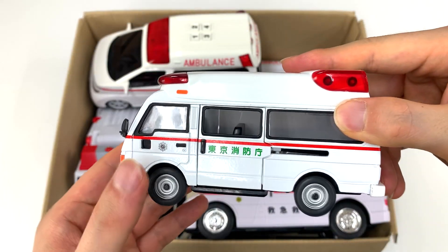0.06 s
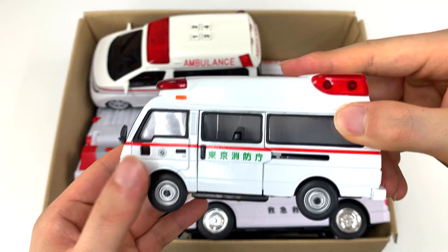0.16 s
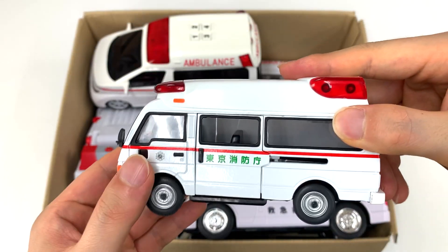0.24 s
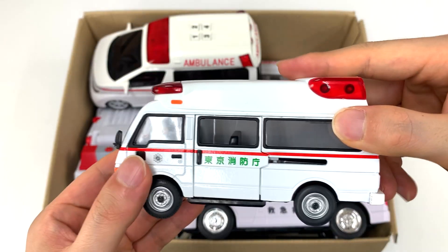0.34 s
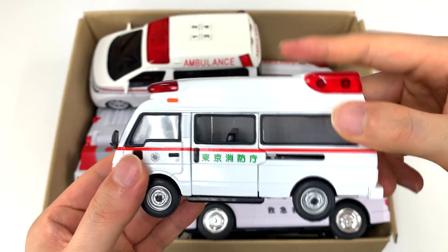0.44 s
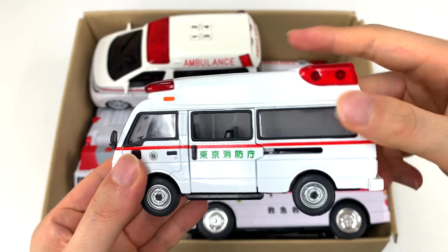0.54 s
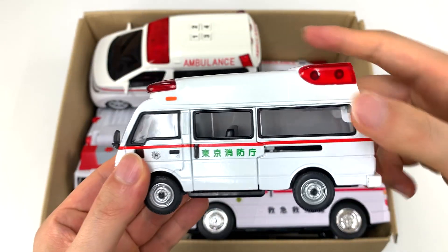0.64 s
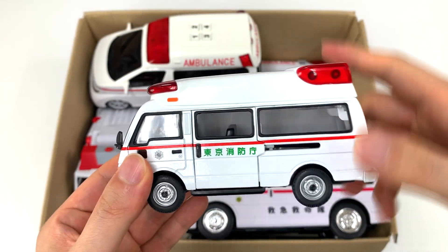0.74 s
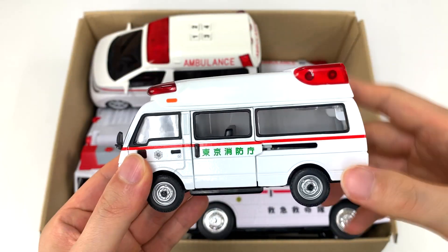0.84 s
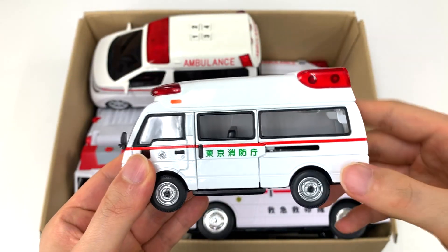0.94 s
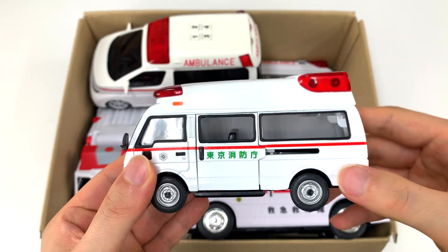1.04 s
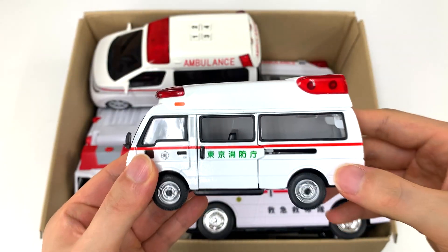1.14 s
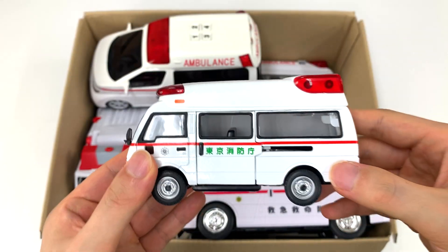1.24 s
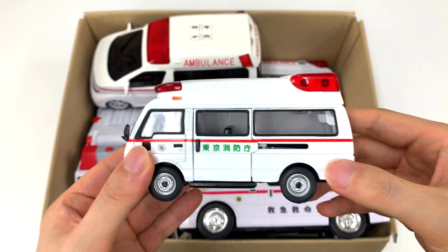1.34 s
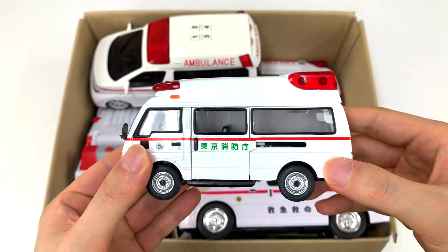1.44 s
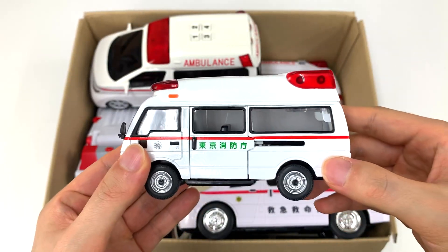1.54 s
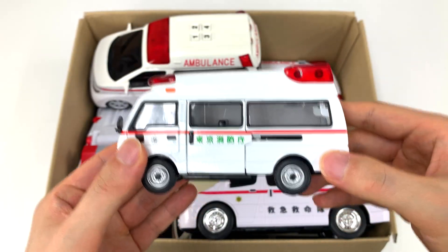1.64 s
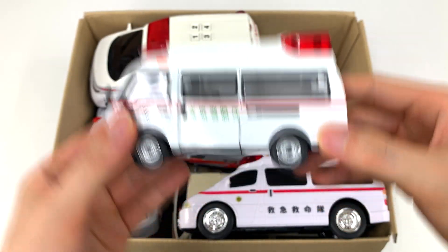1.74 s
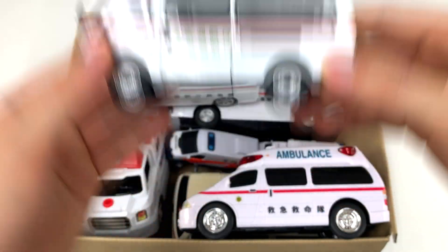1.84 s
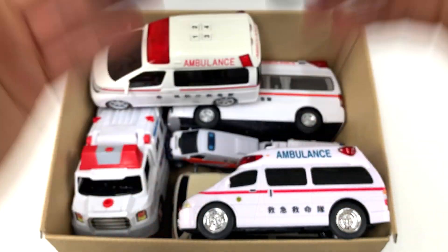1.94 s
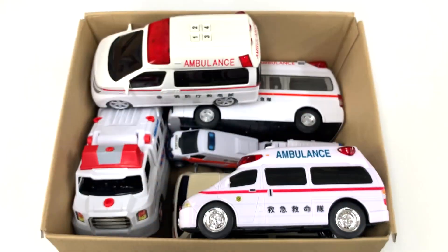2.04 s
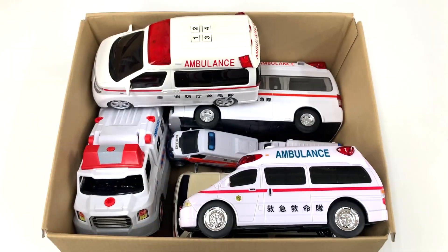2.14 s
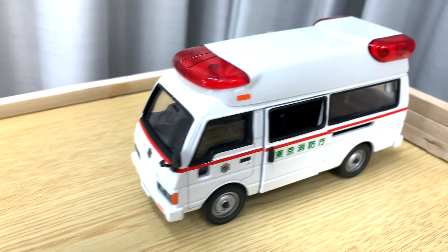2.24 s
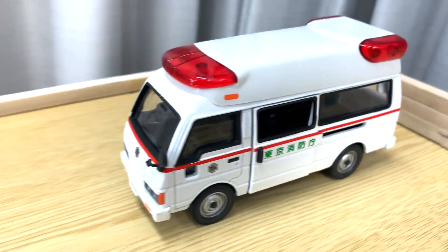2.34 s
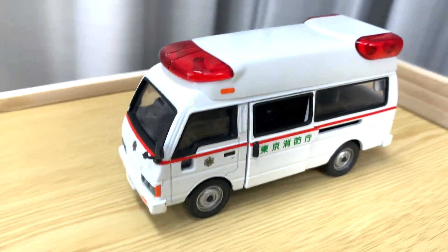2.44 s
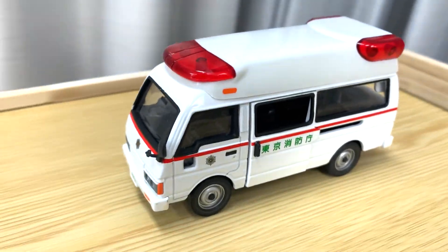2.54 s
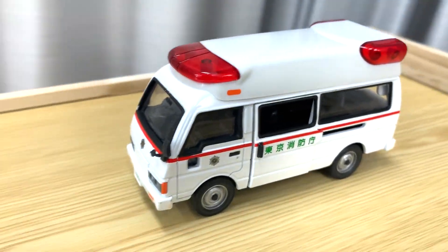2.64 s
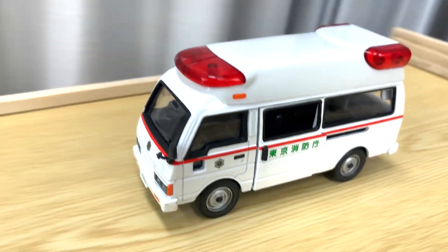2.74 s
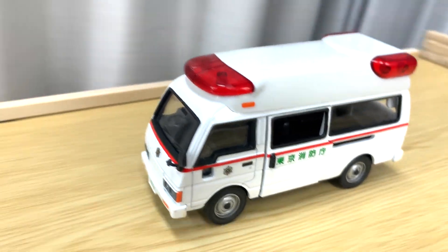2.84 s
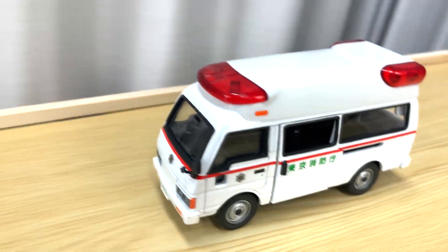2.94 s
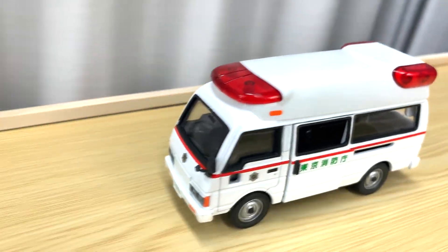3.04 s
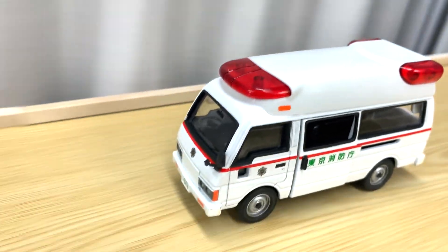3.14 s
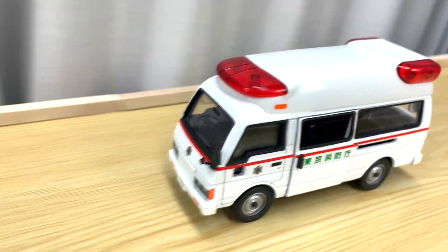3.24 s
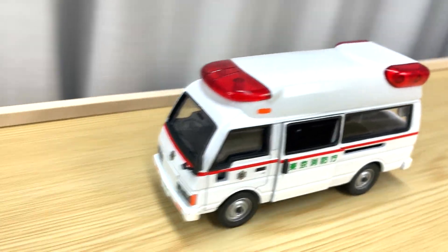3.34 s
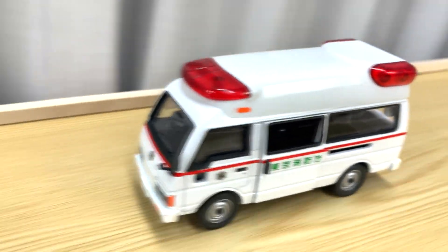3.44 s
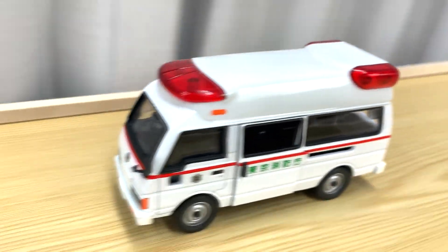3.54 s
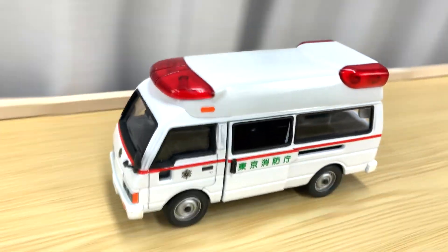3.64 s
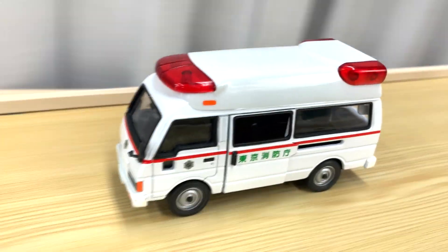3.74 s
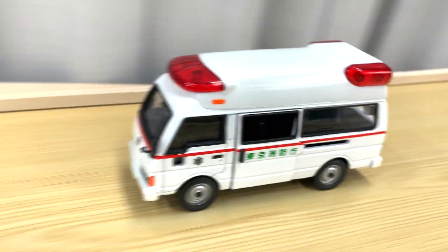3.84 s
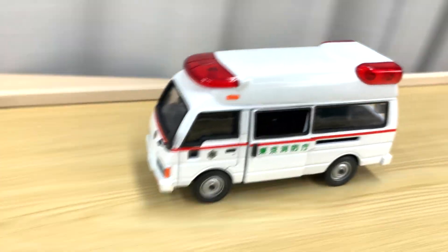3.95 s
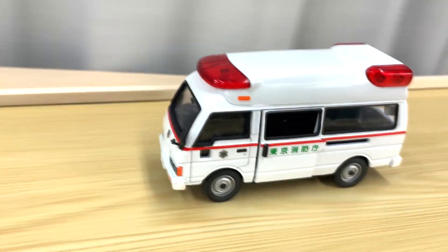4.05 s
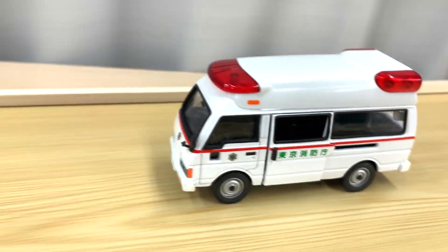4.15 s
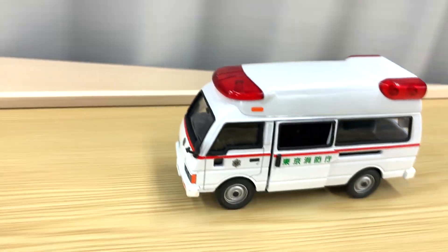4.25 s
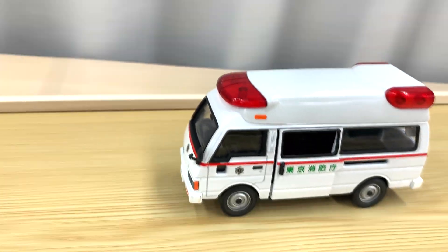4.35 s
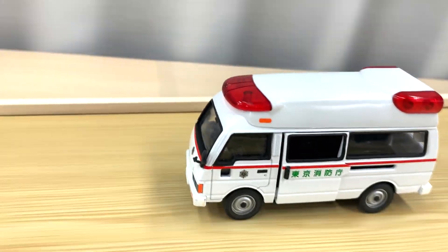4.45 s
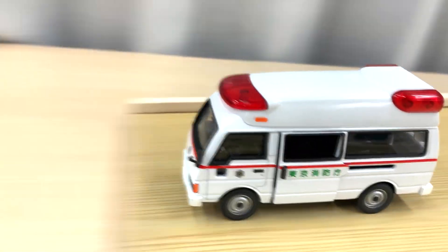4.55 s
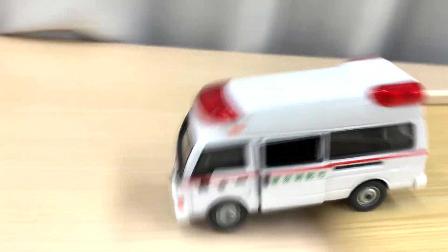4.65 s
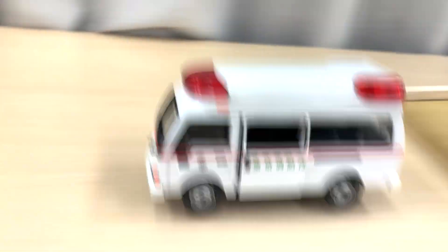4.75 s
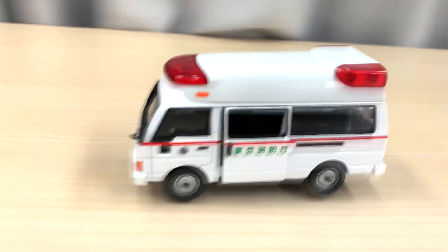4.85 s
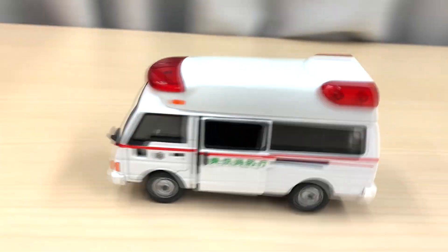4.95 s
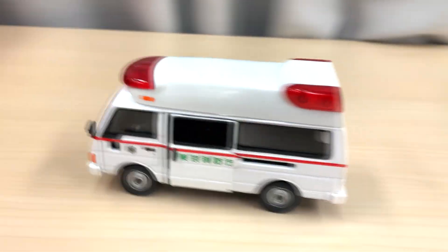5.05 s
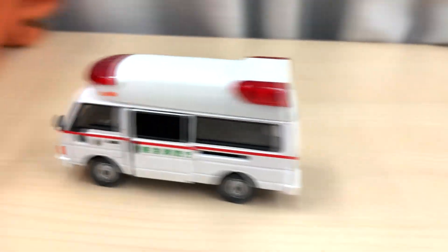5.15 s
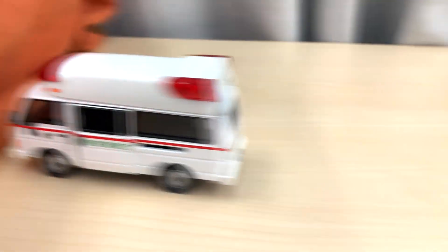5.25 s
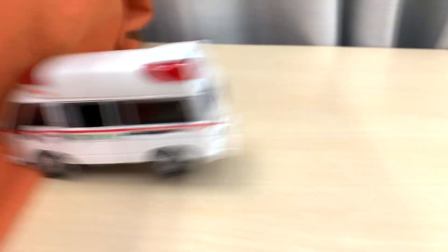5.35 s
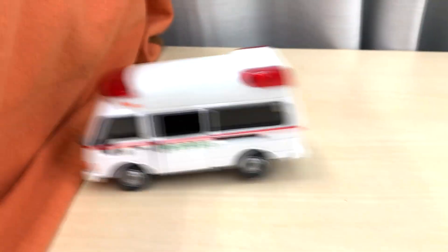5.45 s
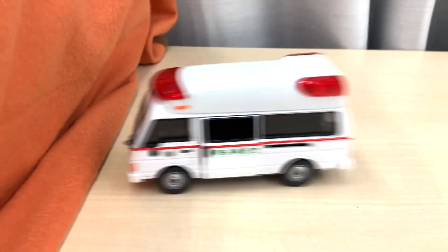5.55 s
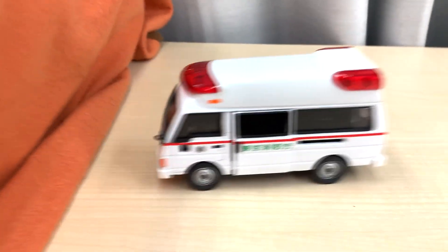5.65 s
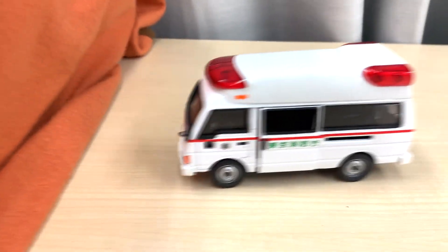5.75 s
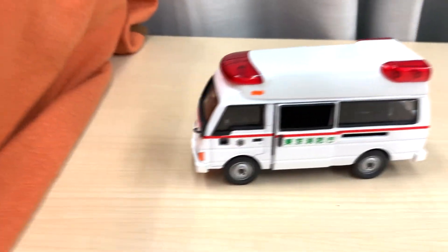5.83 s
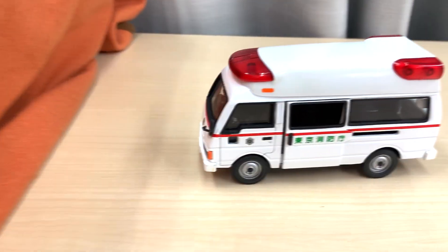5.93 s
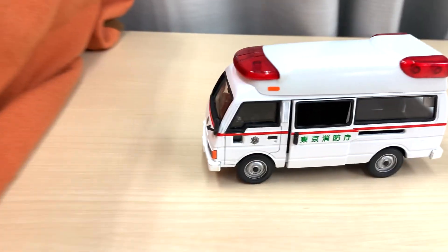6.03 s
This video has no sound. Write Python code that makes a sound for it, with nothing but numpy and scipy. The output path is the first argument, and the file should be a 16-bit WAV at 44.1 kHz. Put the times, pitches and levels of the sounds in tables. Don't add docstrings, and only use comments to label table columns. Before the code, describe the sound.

Quiet fingering of a hollow metal toy, then its wheels chatter down a wooden slope, drop onto a table with hard clacks and halt.

```python
import sys
import numpy as np
from scipy import signal
from scipy.fft import rfft, irfft, next_fast_len
from scipy.io import wavfile

SR = 44100
rng = np.random.default_rng(int(sys.argv[2]) if len(sys.argv) > 2 else 0)


def store_wav(level_fs):
    pcm = np.round(np.clip(np.atleast_2d(level_fs), -1, 1) * 32767)
    wavfile.write(sys.argv[1], SR, pcm.T.astype(np.int16))


def boost(x):
    u = np.asarray(x, float) / 20
    return 10 ** u


N = 268480
RAMP_ENDS_S = 4.65


def unit(x):
    return x / np.sqrt(np.mean(x ** 2) + 1e-20)


def curves(rows, fade=0.087):
    s, *columns = np.transpose(rows)
    t = np.arange(N) / SR
    gate = np.clip(np.minimum(t - s[0], s[-1] - t) / fade + 1, 0, 1)
    return [np.interp(t, s, column) for column in columns] + [gate]


def wobble(rate, depth_db=None):
    knots = rng.standard_normal(int(N * rate / SR) + 2)
    values = knots if depth_db is None else boost(depth_db * knots)
    return np.interp(np.arange(N) * rate / SR, np.arange(len(knots)), values)


def filtered(x, response):
    m = next_fast_len(N + SR // 2)
    spectrum = rfft(x, m) * response(np.fft.rfftfreq(m, 1 / SR))
    return irfft(spectrum, m)[..., :N]


def band(x, lo_hz, hi_hz):
    edges = signal.butter(3, [lo_hz, hi_hz], "bandpass", fs=SR, output="sos")
    return signal.sosfilt(edges, x)


def noise(alike=1):
    share = np.clip(alike, 0, 1)
    common = np.sqrt(share) * rng.standard_normal(N)
    return common + np.sqrt(1 - share) * rng.standard_normal((2, N))


def ringing(x, modes, shift_db=0, rate=8):
    out, power = 0, 0
    for k, (hz, width_hz, db) in enumerate(modes):
        resonator = signal.iirpeak(hz, hz / width_hz, SR)
        mode = signal.lfilter(*resonator, x * wobble(rate, shift_db))
        out = out + (-1) ** k * boost(db) * mode
        power += boost(2 * db) * np.pi * width_hz / SR
    return out / np.sqrt(power)


def tone(rows):
    hz, db, gate = curves(rows, fade=0.065)
    sine = np.sin(2 * np.pi * np.cumsum(hz) / SR)
    return np.sqrt(2) * gate * boost(db) * wobble(36, 0.41) * sine


def span(rows, rate):
    hz, db, gate = curves(rows, fade=.02)
    swing = signal.savgol_filter(np.array([wobble(rate), wobble(rate)]), 121, 1)
    phase = 2 * np.pi * np.cumsum(hz) / SR
    song = unit(swing[0] * np.sin(phase) + swing[1] * np.cos(phase))
    return gate * boost(db - 1.5) * wobble(16, 1.9) * song


def contacts(events, ping_db, ping_t60, noise_db, sag=0):
    force, pings = np.zeros((3, N + SR)), np.zeros(N + SR)
    t = np.arange(SR // 8) / SR
    for s, db, knock_db, sizzle_db, hz, *length in events:
        lasting_s = max(*length, .004) if length else .008
        start = round((s - .001) * SR)

        def burst(stretch):
            return (1 - np.exp(-t / 0.00051)) * boost(-21 * t / (stretch * lasting_s))

        shape = [boost(knock_db) * burst(1.81), boost(noise_db) * burst(1.0), boost(sizzle_db + 4.0) * burst(0.91)]
        force[:, start:][:, :len(t)] += boost(db) * np.array(shape)
        level_db = db + ping_db + (knock_db if hz < 2400 else 0)
        if length:
            level_db -= 8
        decay = boost(level_db - 60 * t / ping_t60) * (1 - np.exp(-t / 0.0018))
        pressed = sag * (1 - np.exp(-t / .0017))
        pings[start:][:len(t)] += decay * np.sin(2 * np.pi * hz * (t + pressed))
    return force[:, :N], pings[:N]


ALIKE = [0.54, 0.6, 0.95]
# (frequency [Hz], width [Hz], level [dB])
AXLE_MODES = [(7470, 1730, 6), (9190, 1200, 1), (9200, 1200, 1.5), (13100, 800, -2), (13800, 600, -6),
              (15800, 1500, -17)]


def toy(force, body, panels, edge_hz):
    grit = unit(wobble(1500, 1.0))
    shaken = [f * grit * noise(alike) for f, alike in zip(force, ALIKE)]
    low = band(ringing(shaken[0], body, shift_db=2.5, rate=22), 130, edge_hz)
    middle = band(ringing(shaken[1], panels, shift_db=2.5, rate=30), 1800, 6100)
    high = band(ringing(shaken[2], AXLE_MODES, shift_db=0.5, rate=25), 5000, 21000)
    return low + middle + high


# (time [s], level [dB])
ROLL = [(2.29, -75.5), (2.6, -63.5), (2.92, -56.5), (3.25, -51), (3.56, -50.5), (3.85, -42.5), (4.12, -36),
        (4.35, -40.5), (4.53, -36.5), (4.87, -41.5), (5.27, -42), (5.46, -34.5), (5.58, -43.5),
        (5.66, -65.5), (6.09, -107)]


def rolling():
    chatter_db, gate = curves(ROLL, fade=0.0035)
    table = np.clip((np.arange(N) / SR - RAMP_ENDS_S) / 0.06, 0, 1)

    def driven_db(full_db, grows, on_table_db):
        return full_db + grows * (chatter_db + 40) + on_table_db * table

    bumps = np.tanh(wobble(55))
    tyres = boost(driven_db(-40, 0.71, -8.5)) * unit(boost(4.7 * bumps) * wobble(300, 1.2))
    chatter = boost(chatter_db) * unit(boost(3.5 * bumps + 7.5 * np.tanh(wobble(400))))
    axles = boost(-40) * (chatter / boost(-32.5)) ** 1.83
    drumming = boards(driven_db(-41, 0.3, 3.9), driven_db(-46, 0.36, 4.7))
    return gate * np.array([tyres, chatter, axles]), gate * drumming


def rattles(rows, hz, scatter_hz, knock_db, loss_db):
    out = []
    for (s, db, sizzle_db, rebounds), luck in zip(rows, rng.standard_normal((len(rows), 5))):
        flight_s = max(0.027 - 0.0063 * (s - ROLL[0][0]), .0185)
        body_db = knock_db - 0.62 * (db + 31.5)
        if s > RAMP_ENDS_S:
            flight_s = 0.0064
            body_db -= 8
        for k in range(int(np.clip(round(rebounds), 0, 4)) + 1):
            out.append((s + k * flight_s, db - k * loss_db, body_db, sizzle_db, hz + scatter_hz * luck[k]))
    return out


# (time [s], peak [dB], sizzle [dB], rebounds [count])
AXLE_TICKS = [(2.434, -48, -40, 0), (2.5895, -38, -14.5, 2), (2.765, -35, -18, 0), (2.8055, -38.5, -13, 0),
              (2.882, -39.5, -27, 0), (2.9265, -44, -11, 0), (3.031, -36, -13.5, 1), (3.1415, -28, -13, 0),
              (3.2462, -36, -12, 1), (3.2812, -34, -35, 0), (3.5135, -28.5, -8.5, 0), (3.9567, -25, -6, 0),
              (4.0165, -23, -8, 0), (4.2352, -23, -3, 0), (4.3887, -23, -7.5, 0)]


def axle_ticks():
    return rattles(AXLE_TICKS, hz=3516.5, scatter_hz=73, knock_db=-5.5, loss_db=2.5)


# (time [s], peak [dB], sizzle
# [dB], rebounds [count])
DOOR_SLAPS = [(3.1796, -37.5, -17.5, -1), (3.426, -33, -17.5, 0.5), (3.8665, -40, 2, -1),
              (3.3277, -33.5, -26.5, -0.5), (3.449, -36, -18, -2), (3.4966, -34, -20, 4),
              (3.597, -31, -34, -5), (3.6716, -20.5, -16, 4), (3.796, -35.5, -5, 0),
              (3.8866, -28.5, -13, -2), (4.148, -19, -12, -2.5), (4.2114, -26.5, -3, -1),
              (4.273, -23.5, -16.5, 0.5), (4.4479, -25, -10, -2.5), (4.5955, -23.5, -8.5, 4.5),
              (4.6208, -12, -2, 0), (5.013, -24, -6, 0), (5.0988, -44, 7.5, -1.5), (5.385, -41.5, 0, -1)]


def door_slaps():
    return rattles(DOOR_SLAPS, hz=2640.5, scatter_hz=72.5, knock_db=-4, loss_db=4.5)


# (time [s], peak [dB], body knock [dB], ping [Hz], burst length [s])
CLACKS = [(4.637, -32, -15, 3300, 0.02), (4.67, -19.5, -31, 3560, 0.035), (4.6779, -6, -5.5, 3830, 0.0058),
          (4.7445, -10, -6, 2600, 0.012), (4.7578, -9.5, -23, 4110, 0.017),
          (4.822, -15.5, -12.5, 4240, 0.016), (4.828, -7.5, -10, 3510, 0.0079),
          (4.8685, -21, -10.5, 2800, 0.019), (4.8885, -15, -10.5, 2840, 0.012),
          (4.924, -25, -9.5, 3200, 0.022), (4.9347, -22.5, -8, 2500, 0.0089),
          (4.969, -24.5, -3, 2760, 0.012), (4.982, -22.5, -6.5, 2740, 0.02),
          (5.0305, -16, -11, 3250, 0.009), (5.056, -28, -7, 2800, 0.028), (5.326, -24.5, -9, 3200, 0.016),
          (5.328, -17.5, -9, 2930, 0.013), (5.333, -14, -11, 3300, 0.02), (5.3387, -8, -12.5, 3050, 0.013),
          (5.396, -32, -1, 3306, 0.034), (5.429, -7.5, -14, 4090, 0.014),
          (5.4314, -18.5, -12.5, 4030, 0.057), (5.5027, -7.5, -10.5, 2640, 0.014),
          (5.5486, -12, -11, 2930, 0.012), (5.579, -26, -7, 3260, 0.026), (5.601, -30, -18, 2893, 0.0091)]


def clacks():
    return [(s, db, knock_db, -3, hz, length) for s, db, knock_db, hz, length in CLACKS]


def ticks(rows, gain_db, knock_db, sizzle_db):
    return [(s + .0012, db + gain_db, knock_db - 0.62 * (db + 30.5), rel_db + sizzle_db, hz)
            for s, db, hz, rel_db in rows]


# (time [s], peak [dB], ping [Hz], sizzle [dB])
FAST_TICKS = [(3.4103, -36.5, 3634, -14.5), (3.5141, -27, 3570, -5.5), (3.5455, -27, 3454, -15.5),
              (3.6208, -35, 3375, -11), (3.6722, -39.5, 3790, -2), (3.6897, -43.5, 3310, -17),
              (3.7096, -41.5, 3350, -13.5), (3.7251, -33, 3570, -9.5), (3.747, -31.5, 3650, -2.5),
              (3.783, -38.5, 3445, -10.5), (3.8214, -29.5, 3690, -5.5), (3.8563, -31, 3500, -13.5),
              (3.8877, -37, 3740, -1.5), (3.9256, -24, 3600, -4), (3.9576, -24, 3500, -11.5),
              (3.978, -29, 3700, -10), (3.9975, -21, 3510, -15), (4.0154, -33.5, 3420, -4),
              (4.0598, -37.5, 3555, -21), (4.0743, -38, 3546, -13), (4.0888, -20, 3410, -5.5),
              (4.1107, -21, 3664, -6), (4.1282, -22, 3610, -7), (4.1706, -35, 3700, -8),
              (4.1865, -35, 3660, -11), (4.2105, -35.5, 3750, -2.5), (4.2339, -24, 3550, -2),
              (4.2519, -28, 3520, -9.5), (4.2718, -36.5, 3720, -8.5), (4.2908, -29, 3600, -13),
              (4.3088, -37.5, 3580, -14.5), (4.3232, -26.5, 3510, -15.5), (4.3372, -18.5, 3420, -13.5),
              (4.4245, -35.5, 3315, -10.5), (4.4634, -25, 3400, -10.5), (4.4819, -22, 3400, -14.5),
              (4.5208, -30.5, 3690, -9.5), (4.5392, -20.5, 3490, -12), (4.5951, -32, 3520, -1.5),
              (4.6146, -31, 3440, 7.5)]


def fast_ticks():
    strikes = ticks(FAST_TICKS, gain_db=-1.0, knock_db=-11.5, sizzle_db=-1.5)
    return contacts(strikes, ping_db=11.5, ping_t60=0.0098, noise_db=-6.0)


# (time [s], peak [dB], ping [Hz], sizzle [dB])
TABLE_TAPS = [
    (5.1269, -19.5, 2530, -5.5),
    (5.1497, -28, 2560, -5),
    (5.17, -26, 2540, -9.5),
    (5.1868, -29, 2950, -0.5),
    (5.198, -34.5, 3200, -5.5),
    (5.2251, -43, 3150, -3.5),
    (5.2583, -19, 2520, -10.5),
    (5.2804, -19, 2530, -15),
    (5.3014, -31, 2560, 0),
    (5.317, -29, 3150, -9),
]


def table_taps():
    strikes = ticks(TABLE_TAPS, gain_db=5.0, knock_db=-6.5, sizzle_db=-2.5)
    return contacts(strikes, ping_db=3.5, ping_t60=0.03, noise_db=-5.5, sag=.00045)


def knocks(rows, gain_db, t60, attack):
    out, t = np.zeros(N + SR), np.arange(SR // 10) / SR
    for (s, db, hz), luck in zip(rows, rng.standard_normal((len(rows), 2))):
        twin_hz = hz * (1 + 0.054 * luck[0])
        pair = np.sin(2 * np.pi * hz * t) + 0.69 * np.sin(2 * np.pi * twin_hz * t + 2 * luck[1])
        decay = boost(db + gain_db - 60 * t / t60) * (1 - np.exp(-t / attack))
        out[round((s - .001) * SR):][:len(t)] += decay * pair
    return out[:N]


# (time [s], peak [dB], pitch [Hz])
ROOF_KNOCKS = [(3.5157, -31.5, 2020), (3.598, -43, 1840), (3.6214, -41.5, 1960), (3.6733, -32.5, 1944),
               (3.6953, -42, 1870), (3.7482, -39, 2020), (3.7846, -42, 1900), (3.8678, -38.5, 1970),
               (3.8893, -38, 2100), (3.9272, -34.5, 1900), (3.9455, -29, 1990), (3.9796, -25.5, 2150),
               (4.0018, -30, 1940), (4.0175, -22.5, 1960), (4.0767, -43, 1920), (4.0907, -33, 2000),
               (4.1113, -29, 1960), (4.1482, -27, 2030), (4.1717, -28.5, 1950), (4.2131, -30, 1810),
               (4.2136, -25, 1960), (4.236, -22, 2000), (4.257, -25.5, 1910), (4.2924, -32.5, 1940),
               (4.3214, -36.5, 2120), (4.3882, -42.5, 1870), (4.4246, -32.5, 1900), (4.4486, -34, 2000),
               (4.47, -31, 1920), (4.4825, -30.5, 2080), (4.523, -34.5, 1900), (4.5458, -38, 1960),
               (4.556, -33, 1860), (4.5798, -37, 1935), (4.5997, -30, 2100), (4.6192, -19.5, 2013)]
# (time [s], peak [dB], pitch [Hz])
FLOOR_KNOCKS = [(2.7934, -47, 1370), (2.8064, -44, 1280), (2.8824, -52, 1400), (2.9707, -43.5, 1325),
                (3.0281, -44, 1320), (3.282, -35, 1390), (3.3287, -34.5, 1280), (3.4268, -29, 1154),
                (3.544, -37, 1310), (3.5963, -28, 1190), (3.6173, -34.5, 1300), (3.672, -34, 1370),
                (3.747, -27.5, 1350), (3.7993, -39, 1450), (3.822, -35.5, 1360), (3.8725, -37, 1350),
                (3.8876, -26, 1457), (3.926, -28.5, 1380), (3.958, -26, 1390), (4.0024, -27, 1250),
                (4.0157, -24.5, 1450), (4.0947, -37.5, 1320), (4.1153, -24, 1370), (4.2158, -27.5, 1510),
                (4.2402, -25, 1350), (4.3231, -30.5, 1470), (4.4099, -42, 1410), (4.4469, -38.5, 1410),
                (4.4706, -32.5, 1360), (4.5387, -35, 1460), (4.5561, -39, 1330), (4.5965, -33.5, 1420),
                (4.6207, -19.5, 1356)]
# (time [s], peak [dB], pitch [Hz])
HARD_KNOCKS = [(3.032, -45, 585), (3.337, -34, 615), (3.339, -35.5, 890), (3.428, -30, 860),
               (3.515, -29, 650), (3.597, -29, 863), (4.681, -17.5, 1507), (4.68, -19, 2000),
               (4.746, -17, 1700), (4.746, -19, 2150), (4.761, -18, 1330), (4.829, -18.5, 2003),
               (4.68, -35, 290), (5.341, -28, 290), (5.338, -26.5, 422), (5.336, -23.5, 794),
               (5.338, -22, 1680), (5.387, -31.5, 1140), (5.435, -31, 560), (5.434, -28, 800),
               (5.506, -25, 402), (5.549, -25.5, 424), (5.441, -21.5, 1360), (5.511, -24.5, 1400),
               (5.554, -25, 1364)]


def shell_knocks():
    roof = knocks(ROOF_KNOCKS, gain_db=1.0, t60=.035, attack=0.0012)
    floor = knocks(FLOOR_KNOCKS, gain_db=-2.5, t60=.04, attack=0.002)
    return roof + floor + knocks(HARD_KNOCKS, gain_db=1.0, t60=0.038, attack=0.0017)


# (time [s], peak [dB], t60 [s], swing [Hz])
THUDS = [(4.62, -37, 0.075, 140), (4.68, -17, 0.038, 156), (4.752, -27.5, 0.044, 131),
         (4.764, -19, 0.04, 155), (4.828, -28.5, 0.1, 164), (4.894, -28.5, 0.059, 124),
         (4.988, -24, 0.045, 123.5), (5.037, -33, 0.11, 94), (5.3375, -3, 0.022, 127),
         (5.4381, -17, 0.046, 109), (5.455, -28.5, 0.21, 133), (5.513, -18.5, 0.046, 106),
         (5.529, -31.5, 0.18, 133.7), (5.556, -31, 0.26, 131)]


def thuds():
    out, t = np.zeros(N + SR), np.arange(SR // 3) / SR
    for s, db, t60, hz in THUDS:
        swing = boost(15.0 - 60 * t / t60) * np.sin(2 * np.pi * hz * t)
        thump = boost(-0.5 - 60 * t / (0.03 + 0.26 * t60)) * np.sin(2 * np.pi * 62 * t)
        onset = 1 - np.exp(-(t / 0.0052) ** 2)
        out[round(s * SR):][:len(t)] += boost(db) * (swing - thump) * onset
    return out[:N]


# (frequency [Hz], width [Hz], level [dB])
SHELL_MODES = [(349, 92, -2), (444, 140, 0.5), (590, 98, 0), (754, 170, 0), (1080, 390, -3), (1380, 150, 1),
               (1637, 110, -2), (1960, 190, -1.5), (2210, 200, -8)]
# (frequency [Hz], width [Hz], level [dB])
PANEL_MODES = [(2592, 380, -3), (2790, 323, -3), (3200, 430, -4.5), (4983, 230, -9), (5780, 1100, -17.5)]


def running_toy(shaking):
    strikes = axle_ticks() + door_slaps() + clacks()
    force, pings = contacts(strikes, ping_db=9.0, ping_t60=0.011, noise_db=-3.5)
    fast, fast_pings = fast_ticks()
    taps, tap_pings = table_taps()
    body = toy(force + fast + taps + shaking, SHELL_MODES, PANEL_MODES, edge_hz=5100)
    return body + pings + fast_pings + tap_pings + shell_knocks() + thuds()


# (frequency [Hz], width [Hz], level [dB])
BOOM_MODES = [(54, 28, 0.0029), (102.7, 19, 0.0047)]
# (frequency [Hz], width [Hz], level [dB])
BOARD_MODES = [(134, 5.2, 5), (167, 110, -13)]


def boards(boom_db, board_db):
    boom = unit(ringing(ringing(noise(1.0), BOOM_MODES), BOOM_MODES))
    board = unit(ringing(ringing(noise(0.92), BOARD_MODES), [(140, 710, 0)]))
    return boost(boom_db + 1.5) * boom + boost(board_db + 2.5) * board


# (time [s], pitch [Hz], level [dB])
WHEEL_BEAT = [
    (3.28, 65.85, -37.5),
    (3.83, 84.5, -37),
    (3.86, 81.6, -73),
]
# (time [s], pitch [Hz], level [dB rms])
SWAY = [
    (4.05, 135, -45),
    (4.12, 134, -27),
    (4.2, 130.7, -39),
    (4.33, 132.3, -38),
]
# (time [s], pitch [Hz], level [dB rms])
RAMP_SPAN = [
    (2.95, 590, -57),
    (3.1, 607, -57),
    (3.8, 572, -45),
    (3.95, 562, -44.5),
    (4.1, 605, -43),
    (4.27, 752, -40),
    (4.35, 735, -45.5),
    (4.37, 735, -70),
]
# (time [s], pitch [Hz], level [dB rms])
TABLE_SPAN = [(4.3, 383, -53), (4.34, 370, -42.5), (4.39, 354, -37), (4.45, 351, -54), (4.5, 361, -64.5),
              (4.98, 359, -55), (5.1, 433, -45.5), (5.2, 427, -36.5), (5.29, 449, -42), (5.32, 430, -60.5),
              (5.57, 335, -60.5), (5.61, 331, -49.5), (5.7, 329.4, -58.5)]


def wood_song():
    beat = tone(WHEEL_BEAT) + tone(SWAY)
    return beat + span(RAMP_SPAN, rate=160) + span(TABLE_SPAN, rate=60)


# (time [s], body [dB], ping [Hz], sharpness [dB])
HANDLING = [(0.1155, -44.5, 903, -6.5), (0.205, -53, 2300, -14), (0.2652, -35, 2270, 2),
            (0.2699, -35, 1870, -4), (0.312, -53.5, 1020, 0), (0.343, -56.5, 1380, -0.5),
            (0.412, -59, 1830, 7), (0.448, -65.5, 1250, 7.5), (0.5394, -71.5, 2026, -8),
            (0.618, -59, 2070, -1), (0.9452, -49, 1270, 1.5), (0.9625, -55.5, 780, -6),
            (0.9727, -52.5, 1080, -6.5), (1.7948, -62, 2000, -12), (1.864, -56, 820, -17),
            (1.877, -44, 2155, -2), (1.888, -52.5, 1960, -5), (1.937, -51.5, 1990, -2.5),
            (1.967, -52, 1380, -4), (2.007, -49.5, 2150, -6.5), (2.0219, -47.5, 1083, 4.5),
            (2.026, -48.5, 1080, 10.5), (2.06, -50.5, 1080, -3), (2.072, -63, 1190, 2.5),
            (2.148, -43, 2430, -2), (2.158, -60, 1200, 0), (2.1844, -51, 1380, -3.5),
            (2.194, -57, 1790, -2), (2.394, -49.5, 1347, -9), (5.9724, -61.5, 1960, -14),
            (6.0312, -61.5, 1422, -20)]


def touches():
    return [(s, db + sharp_db, -sharp_db, -12.5 + 0.99 * sharp_db, hz) for s, db, hz, sharp_db in HANDLING]


# (time [s], level [dB])
RUB = [
    (0.0, -51),
    (0.12, -56),
    (0.234, -58),
    (0.25, -58.5),
]
# (frequency [Hz], width [Hz], level [dB])
CUPPED_MODES = [(560, 75, -6.5), (780, 27, -1), (904, 20, 4), (1060, 38, 2.5), (1190, 47, -6),
                (1470, 58, -2), (1580, 57, -8), (1900, 37, 0), (1960, 30, -6), (2150, 250, -8),
                (2346, 25, -7), (2465, 130, -5.5)]


def rub():
    db, gate = curves(RUB, fade=0.023)
    slips = noise(.7) * wobble(54, 1.6)
    song = ringing(slips, CUPPED_MODES, shift_db=2.2, rate=14)
    song = filtered(song, lambda hz: np.where((hz > 480) & (hz < 2550), 1, boost(-15)))
    return gate * boost(db) * unit(song)


# (frequency [Hz], width [Hz], level [dB])
HOLLOW_MODES = [(590, 110, -8.5), (787, 56, -3.5), (1011, 77, 3.5), (1190, 140, -2), (1320, 63, 0.5),
                (1524, 87, 1.5), (1900, 260, -1.5), (2210, 260, -1), (2540, 280, -3.5)]
# (frequency [Hz], width [Hz], level [dB])
HELD_MODES = [(3170, 380, 6), (4010, 340, -1), (5230, 1200, -1)]


def held_toy():
    force, pings = contacts(touches(), ping_db=1.5, ping_t60=0.04, noise_db=-6.0)
    return toy(force, HOLLOW_MODES, HELD_MODES, edge_hz=7100) + pings + rub()


# (frequency [Hz], t60 [s])
WALLS = [(200, 0.27), (2000, 0.23), (10000, 0.089)]


def walls(x):
    hz, t, z = signal.stft(noise(0.78)[:, :SR // 2], SR, nperseg=256)
    t60 = np.interp(hz, *np.transpose(WALLS))
    tail = signal.istft(z * boost(-60 * t / t60[:, None]), SR, nperseg=256)[1]
    delayed = np.pad(x, (350, 0))[None]
    return signal.fftconvolve(delayed, tail / np.linalg.norm(tail[0]), axes=1)[:, :N]


# (frequency [Hz], density [dB per Hz])
AIR = [(20, -20.5), (50, 0.5), (120, -9), (400, -28), (2000, -44), (5000, -48), (9600, -44.5), (14200, -46),
       (15000, -70.5)]
# (frequency [Hz], level [dB])
HUM = [(119.5, -71.5)]
# (time [s], level [dB])
SETTLING = [
    (0, -67),
    (.4, -64.5),
    (.6, -62),
    (2.25, -60.5),
    (2.3, -59.5),
    (6.09, -58),
]
# (time [s], pitch [Hz], level [dB])
MOTOR = [
    (0.0, 50.3, -66.5),
    (0.55, 49.5, -60),
    (1.3, 53, -50),
    (1.43, 54, -57),
    (1.8, 59, -48),
    (2.02, 60, -48.5),
    (2.1, 60, -64),
]


def background():
    f, density_db = np.transpose(AIR)
    air = unit(filtered(noise(0.72), lambda hz: boost(np.interp(np.log(hz + 1), np.log(f), density_db))))
    t = np.arange(N) / SR
    hum = sum(np.sqrt(2) * boost(db) * wobble(17.0, 0.37) * np.sin(2 * np.pi * hz * t) for hz, db in HUM)
    hum = hum * (t < 2.28)
    return boost(curves(SETTLING)[0]) * (air + boost(65.5) * hum) + tone(MOTOR)


def ports(x, lead):
    return filtered(x, lambda hz: np.exp(np.outer([.5j, -.5j], np.interp(hz, *np.transpose(lead)))))


# (frequency [Hz], phase [rad])
NEAR_LEAD = [(60, 0), (110, .55), (560, 7.3), (1500, 6.5), (1980, 6.7), (2450, 9.9), (2950, 10.2),
             (3300, 9.2), (3650, 6.9), (5300, 6.6), (5750, 4.7), (7000, 3.14), (11700, -3.14),
             (13900, -6.28), (16800, -8.4)]
# (frequency [Hz], phase [rad])
ROOM_LEAD = [(60, 0), (1000, .6), (2700, 1.2), (4800, 0), (7000, -3.14), (11700, -9.42), (13900, -12.57),
             (16800, -14.7)]


def scene():
    shaking, drumming = rolling()
    run = running_toy(shaking)
    hands = held_toy()
    room = walls(boost(-20.5) * run[0] + boost(-12.5) * hands[0])
    near = ports(run + drumming + wood_song(), NEAR_LEAD)
    return near + ports(hands + background() + room, ROOM_LEAD)


def low_pass(x):
    return signal.sosfilt(signal.butter(12, 16810, fs=SR, output="sos"), x)


def record(dry):
    rounded = dry / (1 + np.abs(dry / .85) ** 6) ** (1 / 6)

    def response(hz):
        treble = 1 + (hz / 15800) ** 12
        bass = 1 + (45 / (hz + 1)) ** 8
        return (hz < 16800) / np.sqrt(treble * bass)

    return low_pass(filtered(rounded, response))


dry = scene()
out = record(dry)
store_wav(out)
```